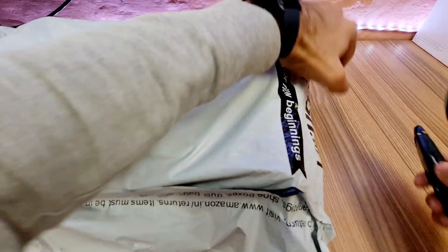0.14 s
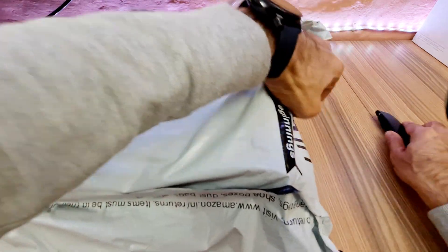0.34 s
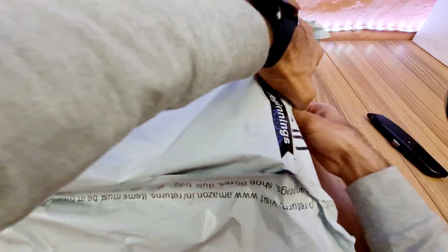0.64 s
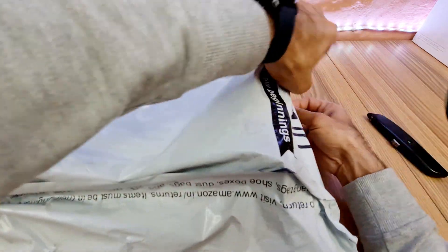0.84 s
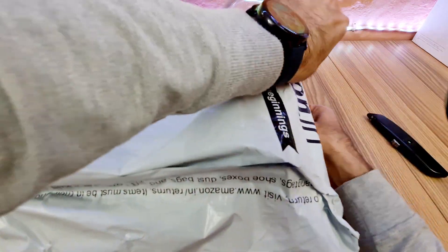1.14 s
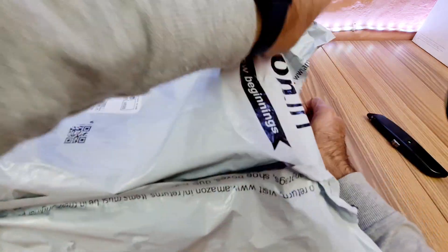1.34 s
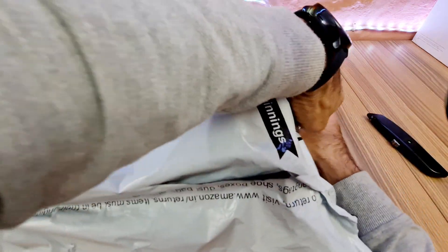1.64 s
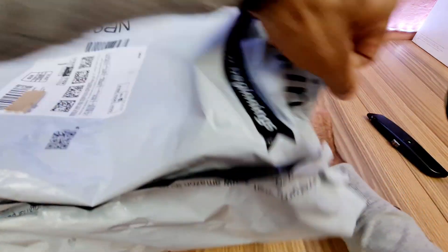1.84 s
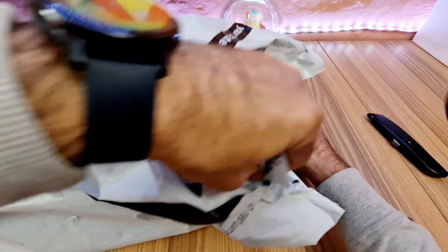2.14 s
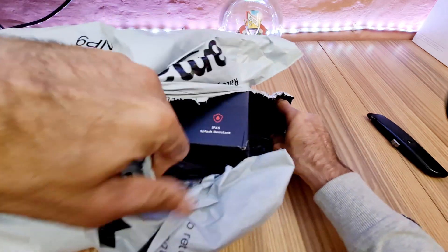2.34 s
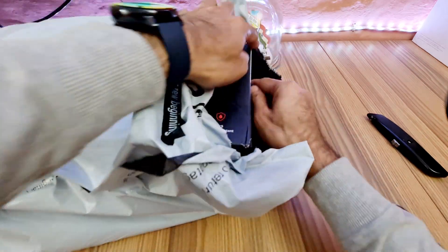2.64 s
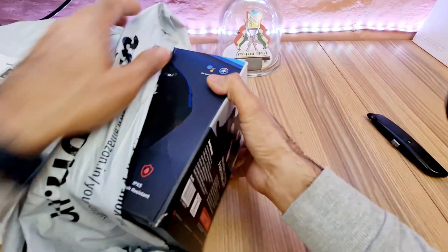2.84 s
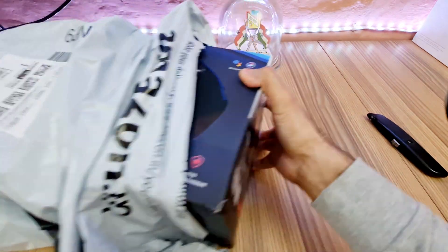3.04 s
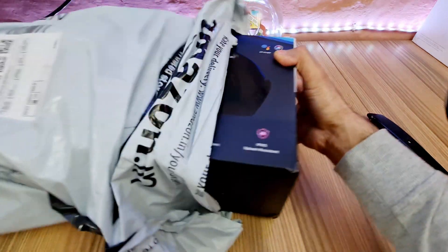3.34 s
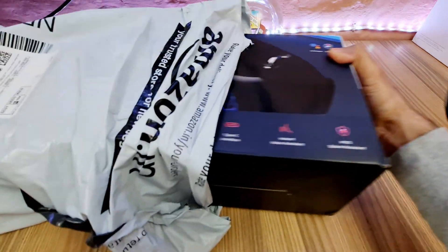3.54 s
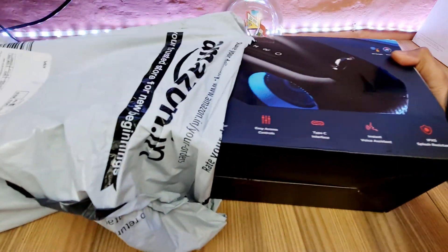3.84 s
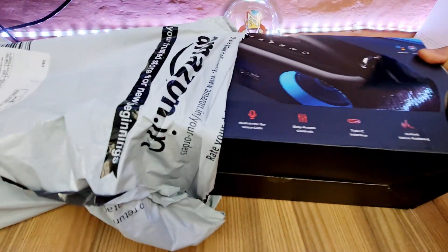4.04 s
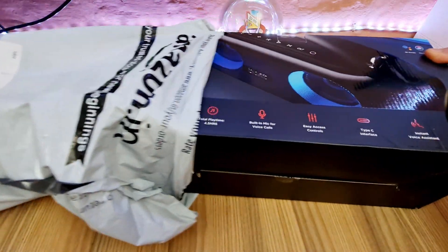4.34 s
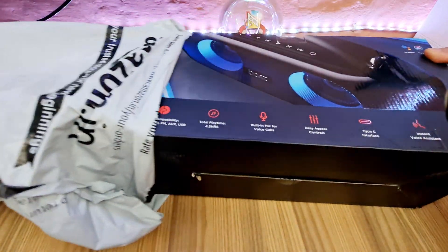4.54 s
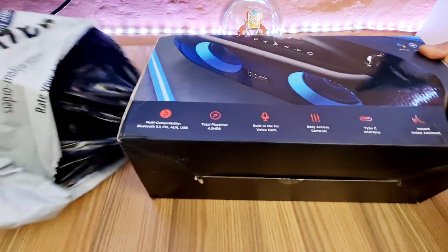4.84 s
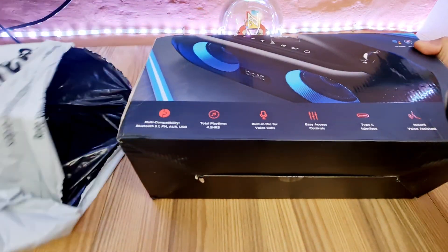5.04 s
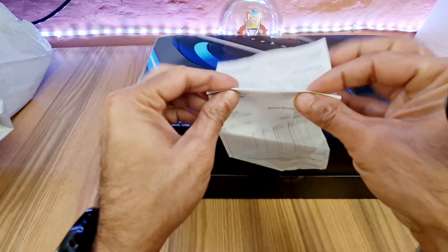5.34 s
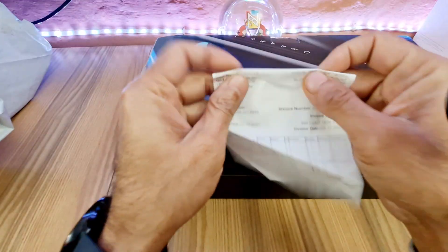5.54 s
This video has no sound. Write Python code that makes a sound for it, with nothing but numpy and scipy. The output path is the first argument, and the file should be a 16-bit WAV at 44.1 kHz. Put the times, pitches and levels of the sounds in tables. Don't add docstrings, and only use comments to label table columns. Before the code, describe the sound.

A plastic mailer crinkles and snaps as it is torn open on a wooden desk, a box slides out, and a paper slip is unfolded.

```python
import sys
import numpy as np
from scipy import signal
from scipy.fft import rfft, irfft, next_fast_len
from scipy.io import wavfile
from scipy.ndimage import map_coordinates

SR = 44100
rng = np.random.default_rng(int(sys.argv[2]) if len(sys.argv) > 2 else 0)


def bounce(signal):
    frames = np.transpose(np.atleast_2d(signal))
    limited = np.clip(frames, -1, 1)
    pcm = np.round(limited * 32767).astype(np.int16)
    wavfile.write(sys.argv[1], SR, pcm)


def makeup_ratio(level_db):
    decades = np.asarray(level_db, float) / 20
    return 10 ** decades


N = 250488

# pitch_hz, level_db (per Hz)
HUM_COLOR = [(20, -4.5), (50, 3), (110, 0), (170, -5.5), (400, -15.5), (700, -13), (1500, -34), (4000, -51),
             (7000, -56), (10000, -48), (16000, -49)]
# pitch_hz, t60_s (time to fall 60 dB)
ROOM_DECAY = [(200, 0.49), (2000, 0.11), (10000, 0.12)]
# pitch_hz, likeness (-1 opposite to 1 same)
LEFT_RIGHT_LIKENESS = [(60, 0.8), (130, 1), (290, 0.69), (640, -0.22), (1410, -0.25), (3100, 0.031),
                       (6820, 0.038), (15000, -0.17)]
# start_s, peak_db, pitch_hz, t60_s
DESK_BUMPS = [(0.384, -48, 566, 0.038), (0.489, -35.5, 446, 0.044), (0.529, -36.5, 430, 0.055),
              (1.27, -28.5, 365, 0.052), (1.52, -38, 425, 0.045), (1.57, -37.5, 473, 0.054),
              (1.789, -24, 357, 0.03), (1.927, -29.5, 68, 0.092), (1.924, -33.5, 164, .08),
              (2.551, -40.5, 118, 0.15), (3.57, -39, 54.1, 0.17), (2.599, -30, 440, 0.03),
              (3.149, -33.5, 408, 0.031), (3.248, -30, 400, 0.067), (3.613, -25, 500, 0.029),
              (3.619, -27.5, 290, 0.02), (3.709, -30, 723, 0.041), (3.961, -31, 584, 0.05),
              (4.557, -30.5, 437, 0.049), (5.171, -38.5, 395, 0.055)]
# start_s, peak_db
KNIFE_DOWN = (.41, -13.5)
# pitch_hz, level_db, t60_s
DESK_RINGS = [(260, -5.5, 0.12), (513, 9, 0.021), (717, -4, 0.068), (864, -27, 0.1), (1166, -2, 0.08),
              (1700, -11, 0.065), (2070, -22, 0.17), (2440, -37, 0.24)]
# start_s, peak_db
BLADE_CLICKS = [
    (0.066, -37.5),
    (.09, -26),
]
# pitch_hz, level_db, t60_s
BLADE_RINGS = [(4110, 7.5, 0.012), (3940, -1, 0.024), (5770, 2, 0.0078), (6770, -0.5, 0.012),
               (3500, -2, 0.011)]
# pitch_hz, level_db (per Hz)
FILM_COLOR = [(880, -16.5), (1500, -13), (1830, -8.5), (2850, 0.5), (3550, -1), (5870, -1), (9500, -7),
              (11800, -4), (15100, -8.5), (16000, -7), (16500, -52)]
# pitch_hz, level_db (per Hz)
BULK_COLOR = [(120, -8), (200, -8), (389, -0.5), (466, -3.5), (1140, -1.5), (1410, 0.5), (1840, -1.5),
              (2500, -4.5), (3250, -13.5), (5500, -120)]
PATCH_PITCHES = [850, 1340, 1890, 2700, 3500, 5830, 6230]
# (here and in the next table, the rise comes before hold_start_s; rise and
# fall each span 20 dB)
GRIPS = [(0, -59.5, .05, 0.0061, 0.027), (.09, -60.5, 0.066, 0, 0.034), (.23, -55, .09, 0.21, 0.44),
         (.31, -49, .15, .085, .09), (.5, -70, 0.12, 0.14, 0.34), (.62, -44, 0.13, 0.026, 0.2),
         (.96, -47.5, 0.026, 0.0073, 0.11), (1.17, -44.5, 0.45, 0.037, 0.083), (1.25, -40, .06, .05, .11),
         (1.45, -57, 0.09, 0.33, .11), (1.71, -36.5, 0.058, 0.1, 0.054), (1.86, -43.5, 0.098, 0.24, 0.087),
         (2.18, -37.5, 0.076, 0.011, 0.34), (2.485, -47, 0.072, 0.18, .15), (2.707, -44.5, 0.15, .02, 0.15),
        (2.79, -50.5, 0.097, 0.078, .15), (2.962, -48, 0.067, 0.048, 0.37),
        (3.099, -41.5, 0.36, .08, 0.022), (3.244, -34.5, 0.097, .005, 0.82),
        (3.52, -42.5, 0.37, 0.15, 0.18), (3.702, -40, 0.18, 0.022, 0.12), (3.942, -44.5, 0.31, 0.1, 0.21),
        (4.207, -41, 0.056, 0.21, 0.13), (4.615, -36, 0.19, 0.0087, 0.07), (4.767, -39, 0.12, 0.015, 0.096),
        (5.042, -47, 0.5, 0.0049, 0.041)]
# hold_start_s, rustle_db, rise_s, hold_s, fall_s
SLIP_FOLDS = [
    (5.138, -70, .11, .12, .11),
    (5.403, -85, 0.16, .05, .11),
    (5.288, -49, 0.047, .005, 0.16),
    (5.466, -46.5, 0.023, .005, 0.09),
    (5.572, -49, 0.056, .005, 0.083),
    (5.663, -49.5, .11, .03, .11),
]
# start_s, pull (-1 slack to 1 taut film), place_db (left over right)
HANDS = [(0, -.3, -3), (.6, -0.21, -2), (1.2, -0.47, -2.5), (1.7, -0.48, -2.5), (2.2, 0.16, 0.3),
         (2.98, .15, .6), (3.15, -0.35, .6), (3.35, 0.83, 1.5), (3.6, 0.92, 0.8), (4.0, -0.34, .1),
         (4.4, 0.83, 0), (4.8, 0.53, 1), (5.03, -.5, .3), (5.15, .1, 0.7), (5.68, -0.48, 2.5)]
# start_s, peak_db, pitch_hz, crack_db (over
FILM_SNAPS = [(0.167, -42, 3680, -9), (0.223, -23.5, 1760, -43), (.306, -22.5, 1820, -27),
              (.346, -21, 2020, -7), (.387, -24, 2640, -12), (.461, -23, 1380, -18),
              (0.489, -24, 6060, -18), (.589, -26, 2860, -6), (0.623, -22.5, 1790, -15),
              (.695, -27.5, 2190, -15), (.711, -18.5, 1570, -28), (.753, -23.5, 4540, -21),
              (.781, -25.5, 1620, -29), (0.838, -32, 1248, -24), (0.886, -24.5, 5970, -4),
              (.979, -23, 1580, -18), (1.008, -23.5, 2730, -28), (1.101, -19.5, 3920, -5),
              (1.13, -16.5, 1250, -30), (1.192, -17, 1260, -22), (1.231, -22, 2500, -2),
              (1.252, -5, 1580, -15), (1.268, -13, 1910, -6), (1.295, -19, 1270, -15),
              (1.306, -18, 1800, -5), (1.382, -26.5, 2700, -7), (1.495, -27, 1020, -15),
              (1.559, -26, 1130, -10.5), (1.59, -22.5, 1100, -7), (1.624, -18.5, 1440, -10),
              (1.664, -19.5, 970, -15), (1.693, -12, 3750, 0), (1.755, -18, 2500, -13),
                 (1.791, -5.5, 1520, -2.5), (1.952, -27, 940, -17), (2.062, -26, 1270, -20),
                 (2.153, -19, 6400, 2.5), (2.175, -12.5, 2900, -27), (2.267, -17.5, 2380, -10),
                 (2.331, -18.5, 1470, -23), (2.372, -19.5, 5000, -21), (2.455, -26, 4430, -19),
                 (2.497, -32, 1490, -10), (2.564, -24.5, 2300, 3), (2.627, -22.5, 1240, -3),
                 (2.709, -21, 1340, -11), (2.919, -29, 2700, 3), (2.967, -22.5, 3000, -1),
                 (3.144, -17, 2330, -21), (3.17, -15.5, 2300, -7), (3.252, -23.5, 900, 6),
                 (3.649, -21, 5500, -13), (3.714, -16, 1240, -23), (3.963, -16.5, 1420, -26),
                 (4.014, -18.5, 1450, -27), (4.206, -34, 2520, -17), (4.558, -11, 1580, -29),
                 (4.748, -18.5, 5900, -14), (4.906, -28.5, 2300, -18), (5.014, -28, 2260, -27)]
# start_s, peak_db, pitch_hz, crack_db (over peak)
SLIP_SNAPS = [(5.18, -52, 3000, -1), (5.262, -37, 2780, -30), (5.283, -8.5, 1560, -24),
              (5.289, -21, 1500, -25), (5.325, -21, 2230, -12), (5.332, -20, 1640, -24),
              (5.36, -27.5, 2350, -26), (5.382, -31.5, 1520, -26), (5.463, -22.5, 5540, -8),
              (5.495, -19, 970, -3), (5.55, -32, 1690, -24), (5.559, -22.5, 1720, -24),
              (5.591, -17, 860, -29), (5.595, -20, 1800, -29), (5.613, -15, 1800, -32),
              (5.621, -25, 1650, -22), (5.658, -7.5, 1400, -11.5)]


def unit(x):
    return x / np.sqrt(np.mean(x ** 2) + 1e-20)


def along(points, hz):
    f, v = np.transpose(points)
    return np.interp(np.log(hz + 1), np.log(f + 1), v)


def curves(rows):
    s, *cols = np.transpose(rows)
    return [np.interp(np.arange(N) / SR, s, c) for c in cols]


def wobble(rate):
    knots = rng.standard_normal(int(N * 60 / SR) + 4)
    return map_coordinates(knots, [np.arange(N) * min(rate, 59) / SR])


def filtered(x, response):
    m = next_fast_len(x.shape[-1] + 8192)
    shaped = rfft(x, m) * response(np.fft.rfftfreq(m, 1 / SR))
    return irfft(shaped, m)[..., :x.shape[-1]]


def resonance(hz, width_hz):
    return lambda f: 1j * f * width_hz / (hz * hz - f * f + 1j * f * width_hz)


def ringing(modes, seconds):
    t = np.arange(int(seconds * SR)) / SR
    phase = np.array([[0], [1.3]])
    rings = sum(makeup_ratio(db - 60 * t / t60) * np.sin(2 * np.pi * hz * t + phase) for hz, db, t60 in modes)
    return rings * (1 - np.exp(-t / 0.0003))


def panned(pair, pan_db):
    return pair * makeup_ratio(np.array([[.5], [-.5]]) * pan_db)


def stereo(pair):
    def turn(hz):
        return np.arccos(np.clip(along(LEFT_RIGHT_LIKENESS, hz), -1, 1)) / 2

    mid, side = filtered(pair, lambda hz: np.array([np.cos(turn(hz)), np.sin(turn(hz))]))
    return np.array([mid + side, mid - side]) * np.sqrt(2)


def add(track, s, sound):
    part = track[:, round(s * SR):][:, :sound.shape[1]]
    part += sound[:, :part.shape[1]]


def lean():
    t = np.arange(N) / SR
    start_s, end_s, extra_db = 0.15, 1.92, 3.5
    return extra_db * np.clip(np.minimum(t - start_s, end_s - t) / 0.28 + .5, 0, 1)


def hum():
    noise = filtered(rng.standard_normal((2, N)), lambda hz: makeup_ratio(along(HUM_COLOR, hz)))
    level_db = -51 + lean() + 0.87 * wobble(1.56) + 0.84 * wobble(4.79)
    return makeup_ratio(level_db) * panned(stereo(unit(noise)), -1.3) / np.sqrt(2)


def room(x):
    hz, t, z = signal.stft(rng.standard_normal((2, SR // 3)), SR, nperseg=256)
    dying = z * makeup_ratio(-60 * t / along(ROOM_DECAY, hz)[:, None])
    tail = signal.istft(dying, SR, nperseg=256)[1]
    late = np.pad(x, ((0, 0), (200, 0)))
    return signal.fftconvolve(late, tail / np.linalg.norm(tail[0]), axes=1)[:, :N]


def bumps():
    out = np.zeros((2, N))
    for s, db, hz, t60 in DESK_BUMPS:
        modes = [(hz, 0, t60), (1.87 * hz, -6, 0.47 * t60)]
        add(out, s, stereo(makeup_ratio(db + 1.0) * ringing(modes, .25)))
    return out


def blade_clicks():
    out = np.zeros((2, N))
    for s, db in BLADE_CLICKS:
        click = ringing(BLADE_RINGS, 0.09)
        t = np.arange(click.shape[1]) / SR
        click = click + 0.38 * rng.standard_normal(click.shape) * makeup_ratio(-60 * t / 0.006)
        add(out, s, panned(stereo(makeup_ratio(db - 9.5) * click), -9.5))
    return out


def knife_down():
    out = np.zeros((2, N))
    s, db = KNIFE_DOWN
    ring = ringing(DESK_RINGS, 0.33)
    t = np.arange(ring.shape[1]) / SR
    dull = unit(filtered(rng.standard_normal(ring.shape), lambda hz: makeup_ratio(along(BULK_COLOR, hz))))
    thud_db, thud_t60_s = -21, 0.086
    thud = dull * makeup_ratio(thud_db - 60 * t / thud_t60_s)
    add(out, s, panned(stereo(makeup_ratio(db - 7.0) * ring + thud), -2.3))
    return out


def strokes(rows):
    t = np.arange(N) / SR
    power = 0
    for s, db, rise, hold, fall in rows:
        before = np.maximum(s - t, 0) / rise
        after = np.maximum(t - s - abs(hold), 0) / fall
        power = power + makeup_ratio(db - 20 * before - 20 * after) ** 2
    return 10 * np.log10(power + 1e-9)


def random_pops(rate, clump_power, spread_db, most, clump):
    pops = rng.random(N) < rate / SR * makeup_ratio(clump_power * clump)
    return pops * makeup_ratio(spread_db * np.minimum(rng.exponential(size=N), most))


def crackle(spectrum, rate, spread_db, life, hiss_db, clump):
    sizes = random_pops(rate, 4, spread_db, 4, clump)
    power = signal.lfilter([1], [1, -np.exp(-1 / (life * SR))], sizes ** 2)
    bursts = unit(np.sqrt(np.abs(power)))
    drive = (bursts + makeup_ratio(hiss_db)) * rng.standard_normal((2, N))
    return unit(filtered(drive, lambda hz: makeup_ratio(along(spectrum, hz))))


def ticks(rate, spread_db, clump):
    out = np.zeros((2, N))
    for hz in PATCH_PITCHES:
        sizes = random_pops(rate, 5, spread_db, 3, clump)
        burst = signal.lfilter([1], [1, -np.exp(-1 / (0.0018 * SR))], sizes)
        peak = resonance(hz, 0.49 * hz)
        patch = filtered(burst * rng.standard_normal((2, N)), lambda f: peak(f) ** 2)
        out += unit(patch) * (hz / 2000) ** -.1
    return unit(out)


def bag():
    rustle_db = strokes(GRIPS + SLIP_FOLDS)
    pull, pan_db = curves(HANDS)
    crisp_db = -3.5 + 0.14 * (rustle_db + 45) + 2.6 * pull
    bulk_db = 1.67 - 4 * pull
    clump = (0.53 * wobble(14) + .6 * wobble(40)) * (1 - .7 * pull)

    def upper(hz):
        return 1 / (1 + (7400 / (hz + 1)) ** 12)

    film = crackle(FILM_COLOR, 500, 1.6, 0.0019, -0.46, clump)
    rustle = makeup_ratio(rustle_db + 5) * unit(filtered(film, lambda hz: 1 - upper(hz)))
    crisp = makeup_ratio(rustle_db + crisp_db) * unit(filtered(film, upper))
    bulk = makeup_ratio(rustle_db + bulk_db + 3.0) * crackle(BULK_COLOR, 200, 3.8, 0.0028, -1.2, clump)
    single = makeup_ratio(rustle_db - 1.5 - 9.5 * np.maximum(pull, 0)) * ticks(14, 2.3, clump)
    return panned(stereo(makeup_ratio(1.35 * clump) * (rustle + crisp + bulk + single)), pan_db)


def snap(db, hz, crack_db):
    t = np.arange(2200) / SR
    t60_s = 0.015 * np.exp(-.02 * (db + 22.5))
    jolt, crack = rng.standard_normal((2, 2, len(t)))
    jolt[:, 30] += 4.5
    shape = (1 - np.exp(-t / (0.055 * t60_s))) * makeup_ratio(-60 * t / t60_s)
    shape = shape + 0.27 * np.roll(shape, 250)
    width_hz = (0.52 * hz + 200) * np.exp(.012 * (db + 19.5))
    ring, film, sheet = resonance(hz, width_hz), resonance(3000, 4000), resonance(750, 700)
    patch = filtered(jolt * shape, lambda f: ring(f) ** 2 + 0.27 * film(f) ** 2 + 0.39 * sheet(f) ** 2)
    crack = filtered(crack * shape, lambda f: resonance(10500, 9000)(f) ** 2)
    patch = patch / np.abs(patch).max(axis=1, keepdims=True)
    pair = patch + makeup_ratio(crack_db - 2.5) * crack / np.abs(crack).max()
    pair[1] = 0.58 * signal.hilbert(pair[0]).imag + 0.66 * pair[1]
    return makeup_ratio(db - 4.0) * pair


def snaps():
    out = np.zeros((2, N))
    place_db = curves(HANDS)[1]
    for s, db, hz, crack_db in FILM_SNAPS + SLIP_SNAPS:
        pan_db = place_db[round(s * SR)] + 2.5 * rng.standard_normal()
        add(out, s, panned(stereo(snap(db, hz, crack_db)), pan_db))
    return out


def scene():
    desk = bag() / np.sqrt(2) + snaps() + blade_clicks() + knife_down() + bumps()
    return desk + makeup_ratio(-13.5) * room(desk) + hum()


def roll_off(x):
    return signal.sosfilt(signal.butter(12, 16990, fs=SR, output="sos"), x)


def record(dry):
    mix = filtered(dry, lambda hz: np.where(hz < 15950, 1, .12) * (hz < 16650))
    return roll_off(mix)


dry = scene()
out = record(dry)
bounce(out)
```